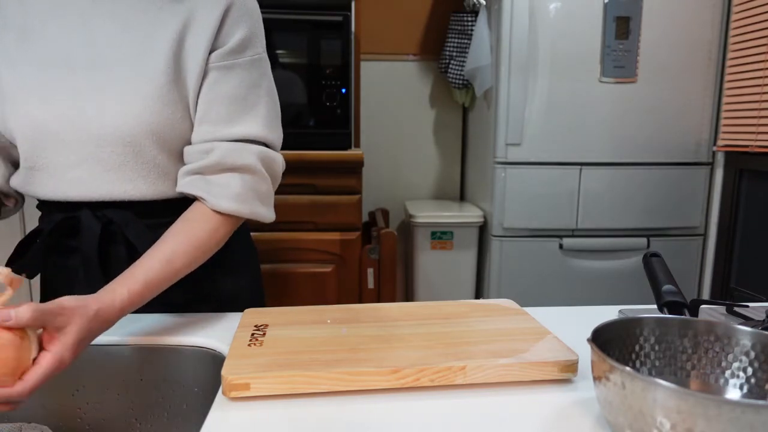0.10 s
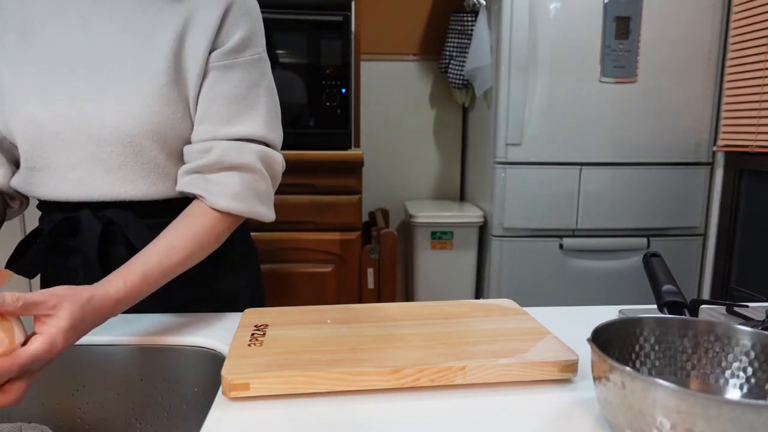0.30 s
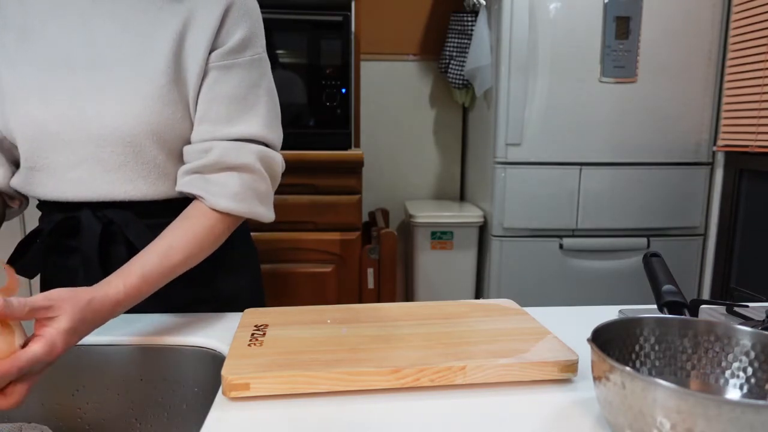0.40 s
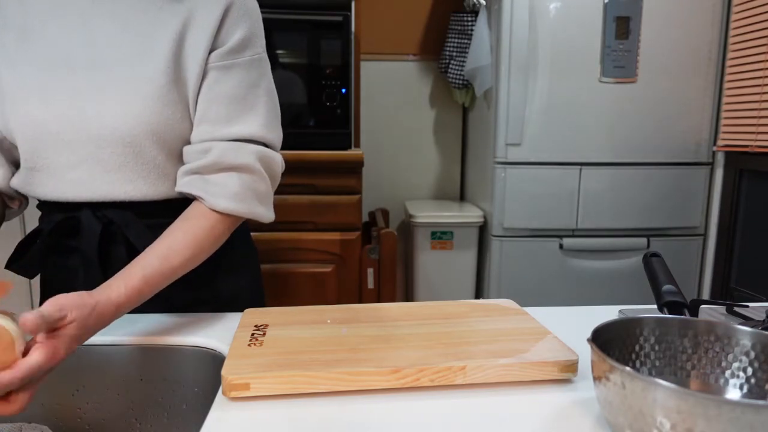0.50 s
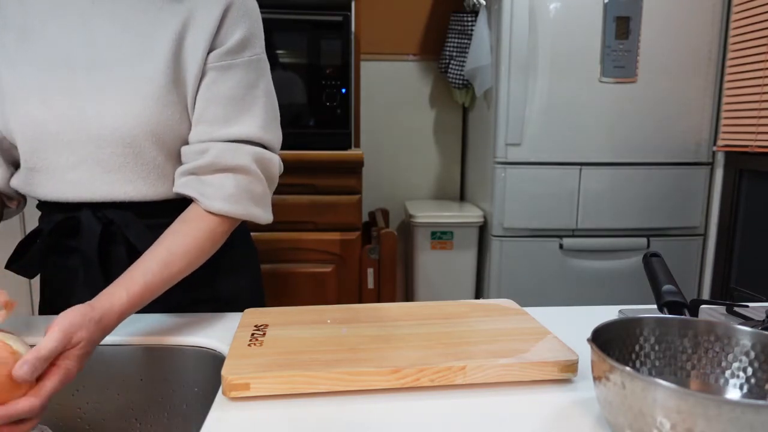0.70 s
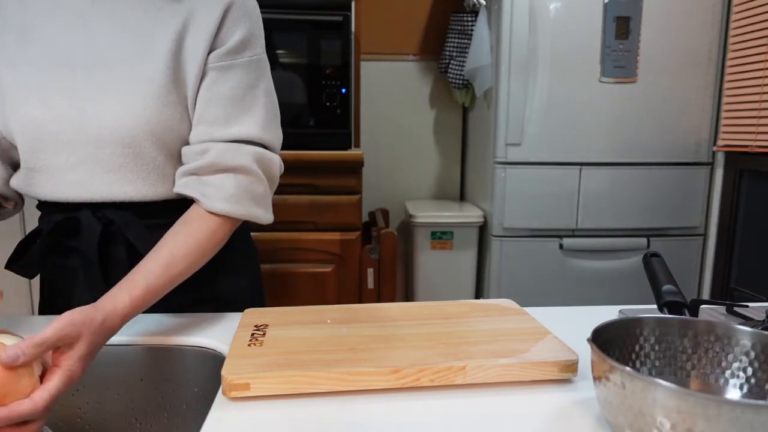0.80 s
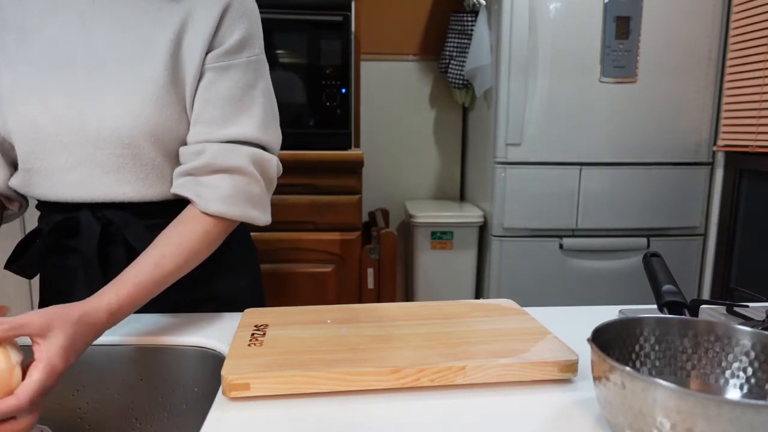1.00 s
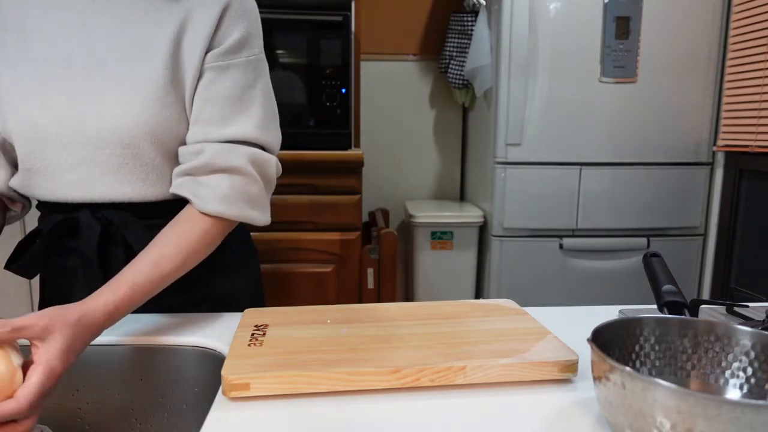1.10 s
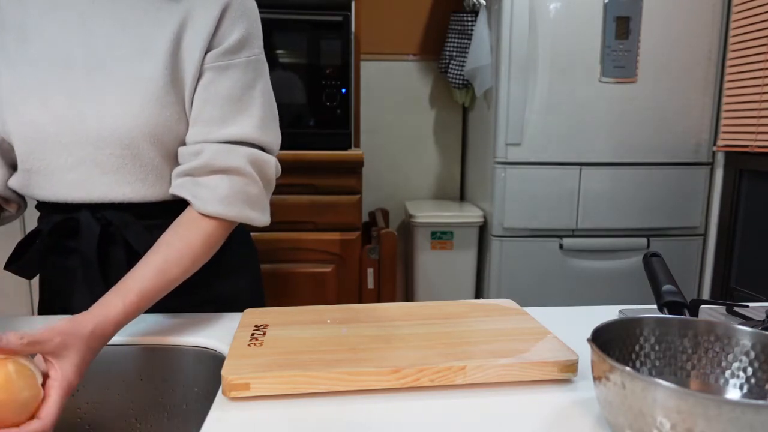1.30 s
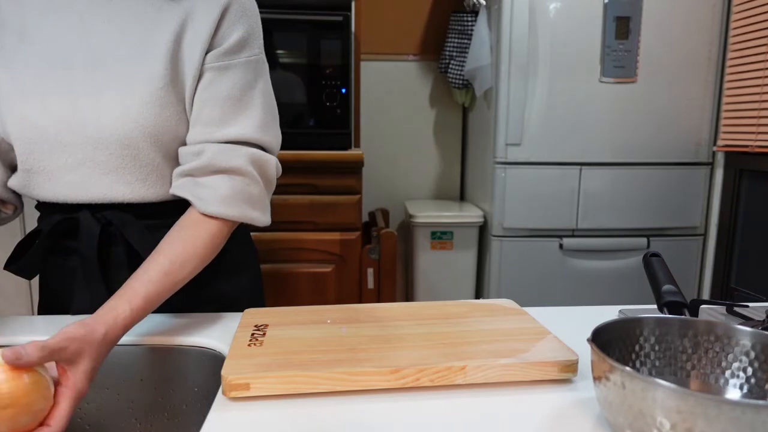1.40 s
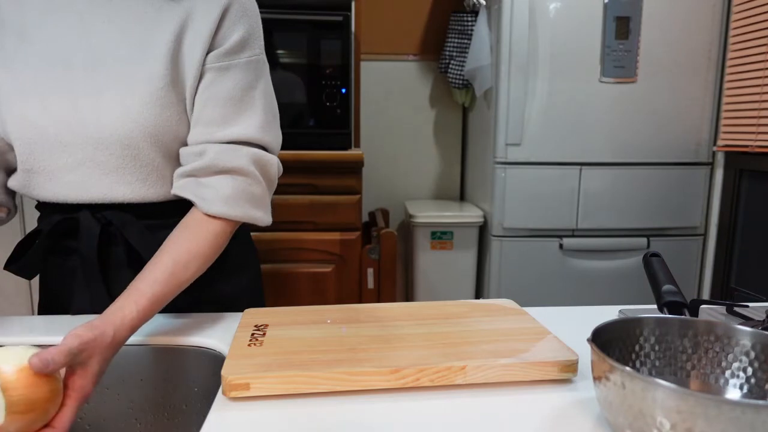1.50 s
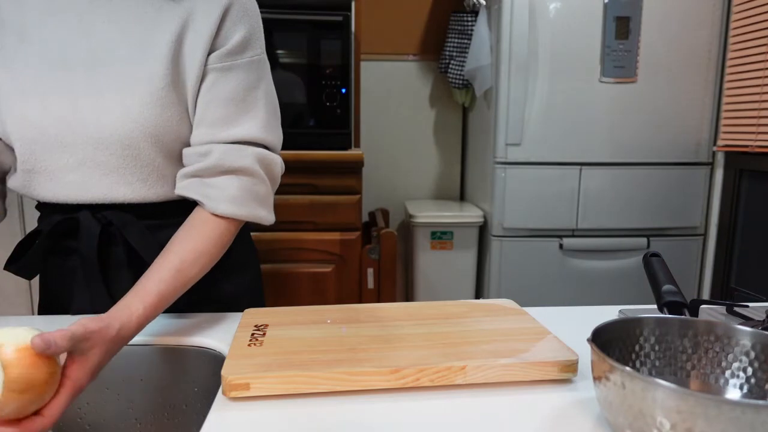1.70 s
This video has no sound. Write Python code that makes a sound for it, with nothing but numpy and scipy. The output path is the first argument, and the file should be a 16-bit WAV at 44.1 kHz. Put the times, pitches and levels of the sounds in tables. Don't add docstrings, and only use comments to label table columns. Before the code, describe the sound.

Close, crisp peeling of papery onion skin, slightly left: small ticks build to loud bright cracks, quiet finger rustle follows, then two snaps and a cluster of crunches fading to light crackle, with short room echo and soft hum.

```python
import sys
import numpy as np
from scipy import signal
from scipy.fft import rfft, irfft
from scipy.io import wavfile
from scipy.ndimage import uniform_filter1d

SR = 44100
rng = np.random.default_rng(int(sys.argv[2]) if len(sys.argv) > 2 else 0)


def ratio(d):
    e = np.asarray(d, float) / 20
    return 10 ** e


def pcm_store(signal):
    levels = np.round(np.clip(np.atleast_2d(signal), -1, 1) * 32767)
    wavfile.write(sys.argv[1], SR, levels.astype(np.int16).T)


N = 77175


def evened(x):
    return x / np.sqrt(np.mean(x ** 2) + 1e-20)


def read(points, hz):
    point_hz, value = np.transpose(points)
    return np.interp(np.log(hz + 1), np.log(point_hz + 1), value)


def add(mix, start_s, sound):
    part = mix[round(start_s * SR):][:len(sound)]
    part += sound[:len(part)]


def resonate(x, hz, width_hz):
    r = np.exp(-np.pi * width_hz / SR)
    return signal.lfilter([1, 0, -1], [1, -2 * r * np.cos(2 * np.pi * hz / SR), r * r], x)


def colour(x, body_db, bright_db):
    # pitch_hz, level_db (per Hz)
    skin_tone = [(400, -28.5), (900, -23.5), (1700, -15), (2600, -9.5), (3700, -3), (6500, -1),
                 (11000, -5.5), (16000, -15.5)]
    knee_hz = 3600
    hz = np.abs(np.fft.fftfreq(1024, 1 / SR))
    octaves = np.log2((hz + 300) / knee_hz)
    body = body_db * np.clip(octaves, -2, 0)
    bright = bright_db * np.maximum(octaves, 0)
    log_gain = np.log(ratio(read(skin_tone, hz) + body + bright))
    taps = np.fft.ifft(np.exp(np.conj(signal.hilbert(log_gain)))).real
    return signal.oaconvolve(x, taps[:512])[:len(x)]


def clicks(count):
    clicks_per_s, spread_db = 12000, 4.5
    chance, rarity, side, drift = rng.random((count, 4)).T
    size = ratio(spread_db * np.minimum(-np.log(rarity + 1e-9), 2.8)) * np.sign(side - 0.5)
    clump = evened(uniform_filter1d(drift - 0.5, 90))
    return size * (chance < clicks_per_s / SR) * ratio(0.83 * clump)


def burst(shape, hz, body_db, bright_db):
    ring_db, ring_width_hz, ring_life_s = -9.5, 340, 0.018
    skin = colour(clicks(len(shape)) * shape, body_db, bright_db)
    held = np.exp(-np.arange(len(shape)) / SR / ring_life_s)
    ring = evened(resonate(skin * held, hz, ring_width_hz))
    sound = evened(skin) + ratio(ring_db) * ring
    return evened(sound) * np.sqrt(np.mean(shape ** 2))


def hum():
    # pitch_hz, level_db (per Hz)
    hum_tone = [(55, -14), (85, -9.5), (175, 0), (320, -1.5), (560, -19.5), (800, -11), (1300, -19.5),
                (16000, -31)]
    # pitch_hz, likeness (0 to 1)
    hum_same = [(60, 0.97), (240, 0.97), (950, 0.26), (3770, 0.2), (15000, 0.26)]
    hz = np.fft.rfftfreq(N, 1 / SR)
    a, b, c, d = rng.standard_normal((len(hz), 4)).T
    same = read(hum_same, hz)
    left, other = a + 1j * b, c + 1j * d
    right = same * left + np.sqrt(1 - same ** 2) * other
    motor_db = 5 * np.exp(-((hz - 175) / 14) ** 2) + 6 * np.exp(-((hz - 98) / 6) ** 2)
    spectrum = np.array([left, right]) * ratio(read(hum_tone, hz) + motor_db)
    return ratio(-56) * evened(irfft(spectrum, N))


def rustle():
    # time_s, level_db
    rub = [(0, -82), (.05, -61), (.09, -55), (.16, -55.5), (.25, -49.5), (.37, -60), (0.602, -44.5),
           (0.698, -66), (.75, -63.5), (.8, -53), (.9, -46), (0.943, -48.5), (0.988, -73), (1.06, -55),
           (1.14, -50), (1.4, -43.5), (1.6, -51.5), (1.69, -73), (1.75, -49)]
    skin = evened(colour(clicks(N), body_db=4, bright_db=-1.5))
    sound = skin + ratio(-14.5) * evened(resonate(skin, 3920, 190))
    return evened(sound) * ratio(np.interp(np.arange(N) / SR, *np.transpose(rub)))


def crunches():
    # start_s, level_db, ring_hz, swell_s (time to the
    # top), body_db (per octave)
    crunch_events = [(.089, -52, 3880, 0.0019, -5), (0.217, -33.5, 10300, 0.0061, -7),
                     (.279, -26.5, 6800, 0.0053, -5), (.196, -32.5, 1950, 0.002, -5.5), (.3, -33, 6000, 0.0043, -4),
                     (.758, -44.5, 6700, 0.0036, -9.5), (1.241, -28, 5950, 0.01, -4.5),
                     (1.291, -25, 4240, 0.0091, -4), (1.304, -24.5, 4560, 0.0013, -11.5),
                     (1.315, -28, 4800, 0.0033, -10.3), (1.324, -28.5, 4360, 0.0066, -4.5),
                     (1.337, -21.5, 6150, 0.0037, .3), (1.373, -33, 9050, 0.0084, -5),
                     (1.392, -37.5, 3400, 0.0039, -2), (1.418, -25.5, 6400, 0.0098, -6.5),
                     (1.438, -33.5, 5460, 0.0025, 14), (1.483, -26, 3600, 0.0065, -5),
                     (1.498, -31, 4770, 0.0018, -1.5), (1.534, -57, 4000, 0.0031, -5),
                     (1.562, -33.5, 6500, 0.0042, -6), (1.571, -34, 2360, 0.0046, -5),
                     (1.604, -40.5, 7900, 0.0061, -11), (1.7, -37.5, 5700, 0.0039, -3.5),
                     (.012, -65, 4900, 0.0028, 3),
        (.7, -54, 6000, 0.0058, 15),
        (1.005, -55.5, 4570, 0.0095, 3),
        (1.027, -49.5, 4800, 0.0098, 3),
        (1.09, -50, 990, 0.017, -7),
        (1.062, -51, 7000, 0.0088, -5),
    ]
    out, t = np.zeros(N), np.arange(4000) / SR
    for start_s, level_db, ring_hz, swell_s, body_db in crunch_events:
        u = t / swell_s
        shape = (u * np.exp(1 - u)) ** 2.42
        add(out, start_s, ratio(level_db) * burst(shape, ring_hz, body_db, bright_db=0.9))
    return out


def snaps():
    # start_s, peak_db, ring_hz, body_db (per octave below the knee),
    # bright_db (per octave above it)
    snap_events = [
        (0.0651, -35, 5840, 14, -1.5),
        (0.1115, -35, 6650, 1.5, -2),
        (0.175, -26, 5950, 1.5, -3),
        (0.196, -17, 2920, 5.5, -8),
        (0.5237, -14, 6400, 17, 9),
        (0.5553, -12, 5700, 2, 5.5),
        (0.626, -27.5, 4050, 14, -10),
        (1.077, -15, 6140, 23, -4.3),
        (1.155, -13, 6900, -6, 5.3),
    ]
    rise_s, hold_s, t60_s, crest_db = 0.00019, 0.0042, 0.017, -12
    out, t = np.zeros(N), np.arange(6000) / SR
    first_break = 0.4 * np.exp(-t / 0.00015)
    fall = ratio(-60 * np.maximum(t - hold_s, 0) / t60_s)
    shape = np.minimum(t / rise_s, 1) * fall + first_break
    for start_s, peak_db, ring_hz, body_db, bright_db in snap_events:
        add(out, start_s, ratio(peak_db + crest_db) * burst(shape, ring_hz, body_db, bright_db))
    return out


def tears():
    # start_s, hold_s, level_db, ring_hz, bright_db (per octave)
    strips = [(0.389, 0.014, -31, 5530, -1.5), (0.392, 0.016, -28.5, 10200, -1.5),
              (0.399, 0.057, -41, 1670, 2), (0.421, 0.0067, -28.5, 3600, -5),
              (0.441, 0.032, -41, 2930, -1.5), (0.494, 0.0036, -28.5, 3620, -8),
              (0.505, 0.0045, -22, 3550, -3), (0.528, 0.021, -27.5, 6130, 3.5),
              (1.083, 0.014, -42, 4200, -1.5), (1.157, 0.057, -36, 4700, -0.9),
              (1.353, 0.11, -41.5, 5850, 3), (1.495, 0.14, -51.5, 2390, 1), (1.705, 0.028, -49.5, 3830, 6),
              (1.272, 0.034, -34.5, 4660, -2.5)]
    rise_s, t60_s = 0.0046, 0.14
    out, t = np.zeros(N), np.arange(9000) / SR
    for start_s, hold_s, level_db, ring_hz, bright_db in strips:
        fall = ratio(-60 * np.maximum(t - rise_s - hold_s, 0) / t60_s)
        shape = np.minimum(t / rise_s, 1) * fall
        add(out, start_s, ratio(level_db) * burst(shape, ring_hz, -0.17, bright_db))
    return out


def flaps(x):
    flaps_db, width_hz, touch_s = -10, 200, 0.005
    out, size = np.zeros(N), round(touch_s * SR)
    for hz in np.geomspace(1700, 12000, 24):
        touch = uniform_filter1d(uniform_filter1d(rng.standard_normal(N), size), size)
        contact = np.maximum(evened(touch) - 1.2, 0)
        out += resonate(x * contact, hz, width_hz)
    return ratio(flaps_db) * np.sqrt(width_hz / SR) * out


def kitchen(x):
    # pitch_hz, t60_s
    decay = [(500, 0.51), (2000, 0.28), (5000, 0.19), (10000, 0.16), (16000, 0.2)]
    out, t_all = np.zeros((2, N)), np.arange(N) / SR
    for k in range(3):
        taps = np.zeros((2, 20000))
        at = np.arange(120, 19980, 20) + rng.integers(0, 20, (2, 993))
        np.put_along_axis(taps, at, rng.choice([-1., 1.], at.shape), 1)
        hz, t, z = signal.stft(taps, SR, nperseg=128)
        fade = ratio(-60 * t / read(decay, hz)[:, None])
        tail = signal.istft(z * fade, SR, nperseg=128)[1]
        tail[1] = 0.81 * tail[0] + 0.73 * tail[1]
        tail = tail / np.linalg.norm(tail[0])
        turn = np.sqrt(2 / 3) * np.cos(np.pi * (7 * t_all + k / 3))
        out += signal.fftconvolve((x * turn)[None], tail, axes=1)[:, :N]
    return out


def counter(peel):
    # pitch_hz, level_db
    apart_tone = [(500, -10), (2000, -4.5), (6000, -3.5), (14000, 1.5)]
    scatter = rng.standard_normal(1600) * ratio(-35 * np.arange(1600) / 1600)
    apart = signal.oaconvolve(peel, scatter / np.linalg.norm(scatter))[:N]
    apart = apart * np.sqrt(2) * np.cos(2 * np.pi * 11 * np.arange(N) / SR)
    gain = ratio(read(apart_tone, np.fft.rfftfreq(N, 1 / SR)))
    return irfft(rfft(apart) * gain, N) * [[1], [-1]]


def scene():
    pan_db, spread_db, echo_db = 1.4, -7, -3.5
    peel = rustle() + crunches() + snaps() + tears()
    thin = signal.butter(2, 330, "high", fs=SR, output="sos")
    peel = signal.sosfilt(thin, peel + flaps(peel))
    direct = peel * ratio([[pan_db], [-pan_db]])
    return direct + ratio(spread_db) * counter(peel) + ratio(echo_db) * kitchen(peel) + hum()


def band_limit(x):
    return signal.sosfilt(signal.butter(12, 17000, fs=SR, output="sos"), x)


def record(dry):
    low_cut = signal.butter(2, 65, "high", fs=SR, output="sos")
    treble_edge = signal.firwin(601, 15850, window=("kaiser", 6), fs=SR)
    mix = signal.oaconvolve(signal.sosfilt(low_cut, dry), treble_edge[None], "same")
    return band_limit(mix)


dry = scene()
out = record(dry)
pcm_store(out)
```